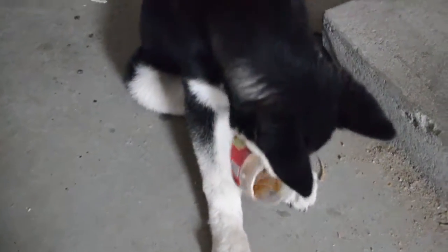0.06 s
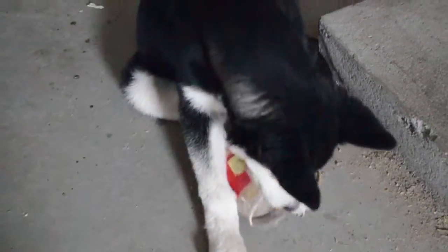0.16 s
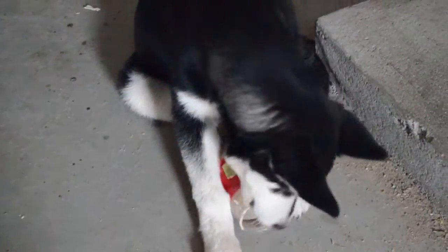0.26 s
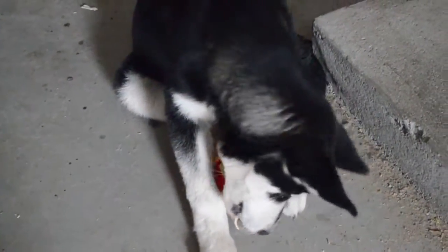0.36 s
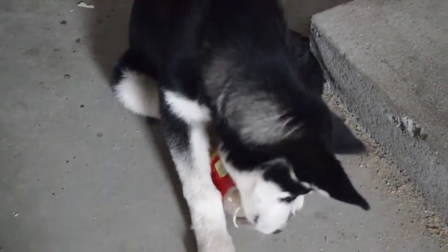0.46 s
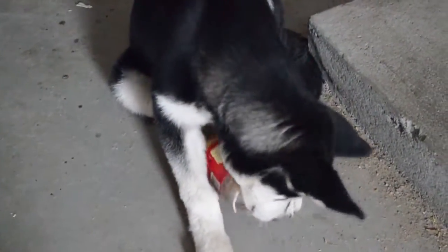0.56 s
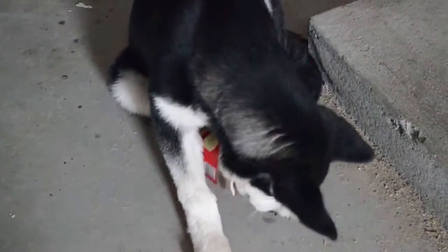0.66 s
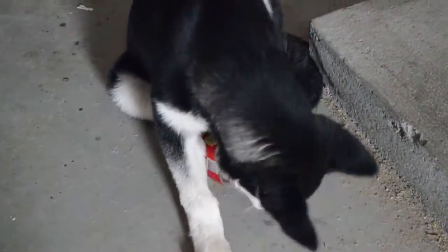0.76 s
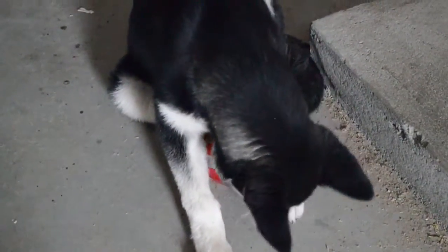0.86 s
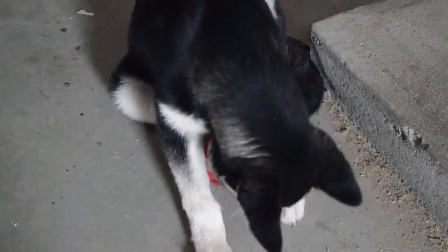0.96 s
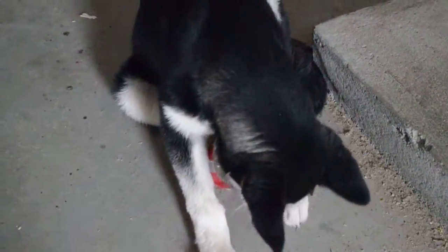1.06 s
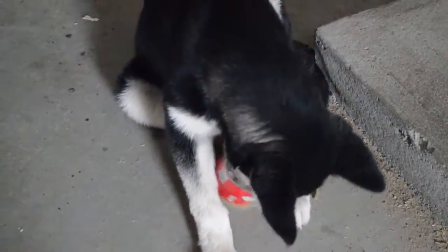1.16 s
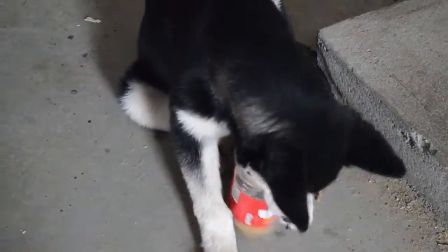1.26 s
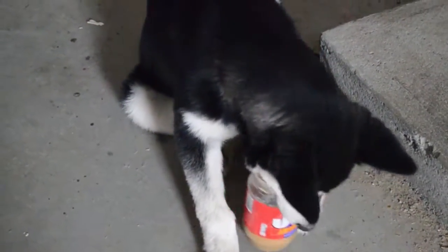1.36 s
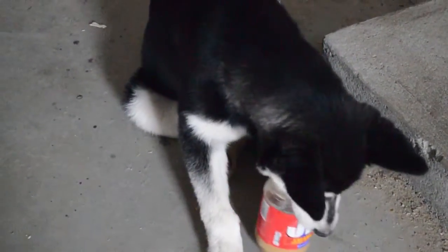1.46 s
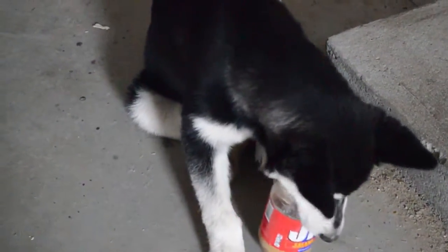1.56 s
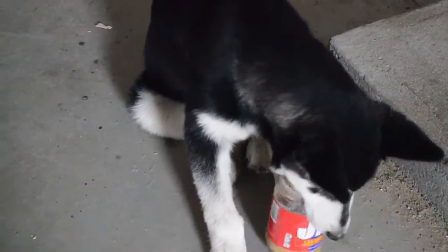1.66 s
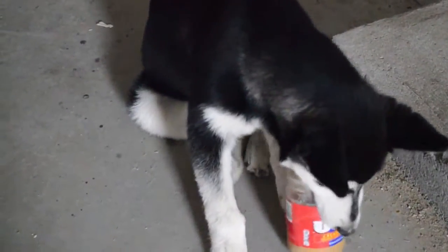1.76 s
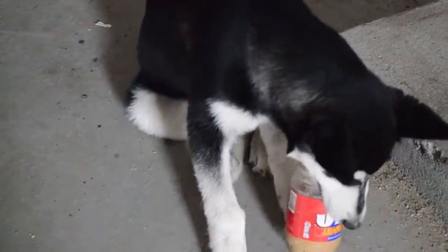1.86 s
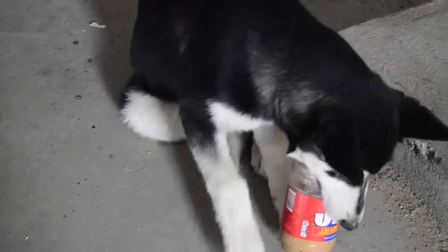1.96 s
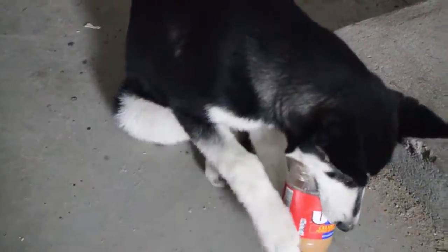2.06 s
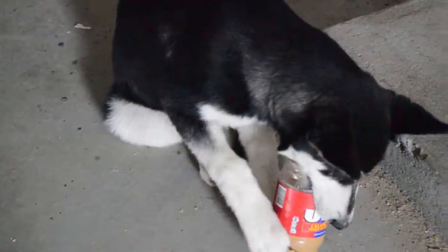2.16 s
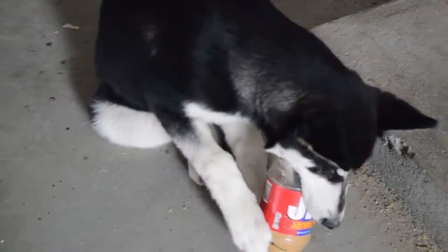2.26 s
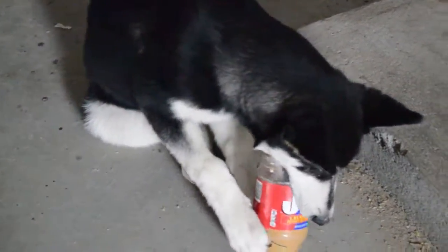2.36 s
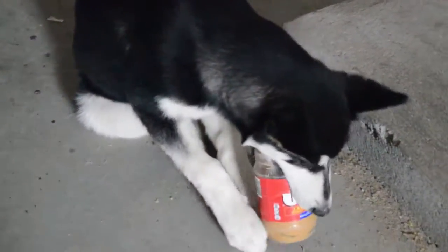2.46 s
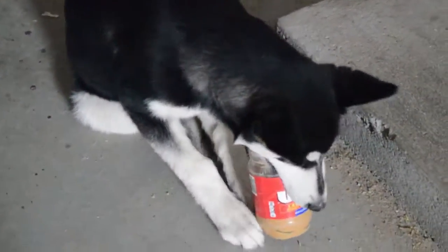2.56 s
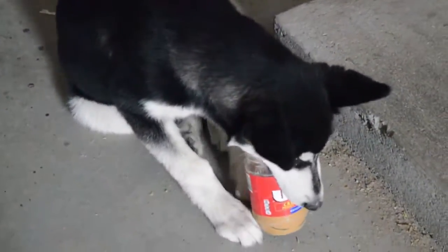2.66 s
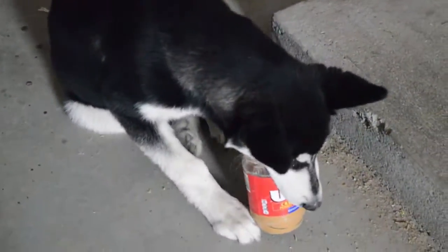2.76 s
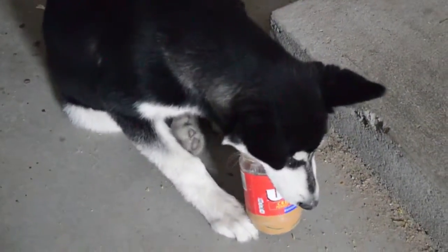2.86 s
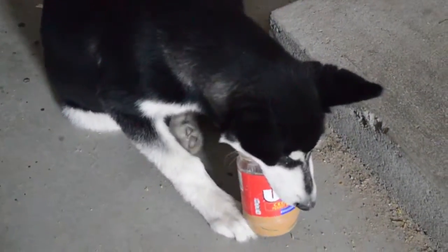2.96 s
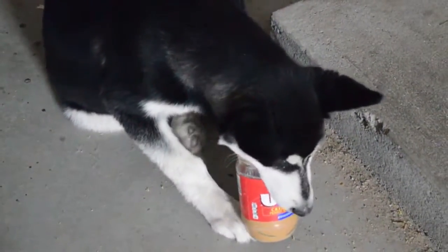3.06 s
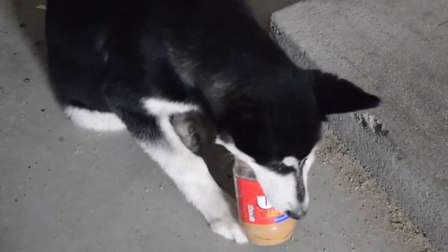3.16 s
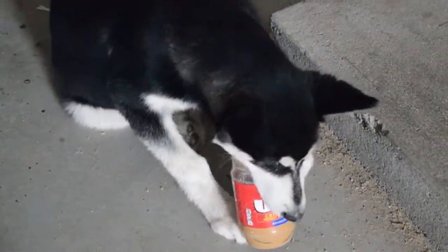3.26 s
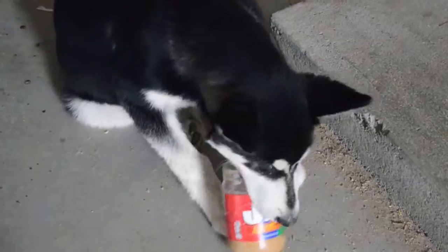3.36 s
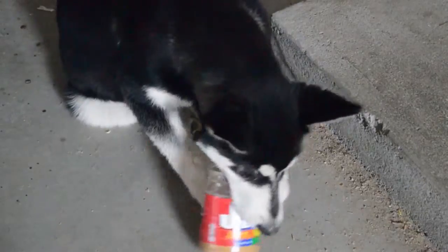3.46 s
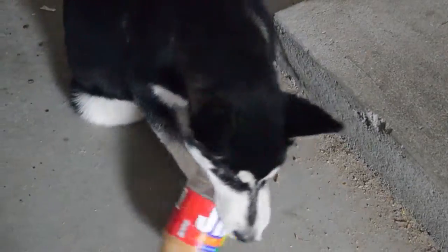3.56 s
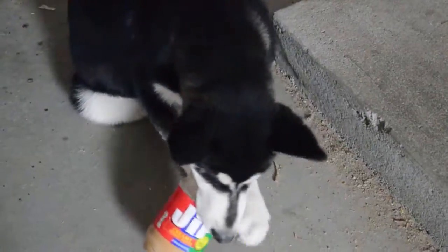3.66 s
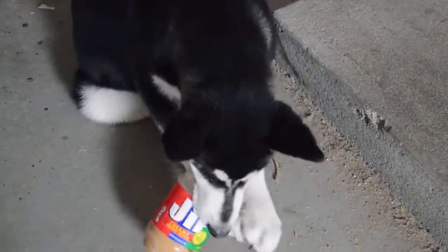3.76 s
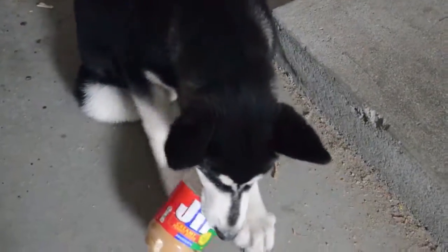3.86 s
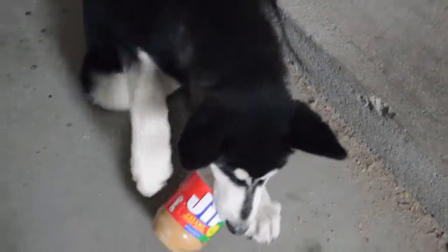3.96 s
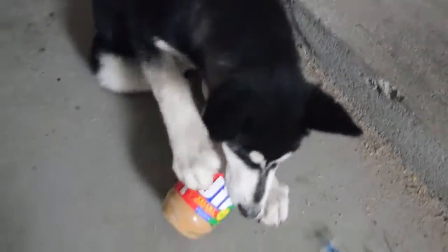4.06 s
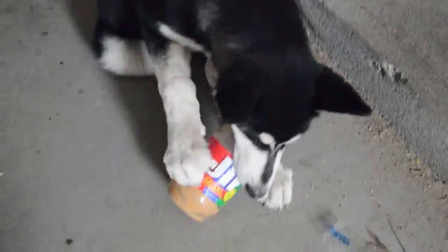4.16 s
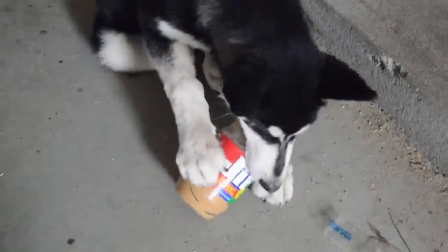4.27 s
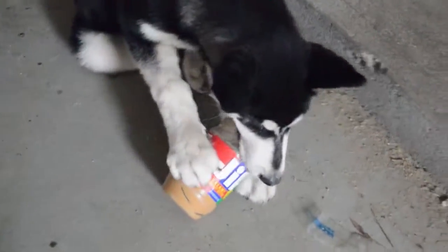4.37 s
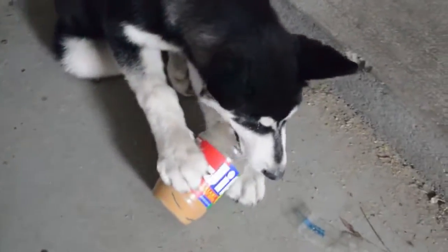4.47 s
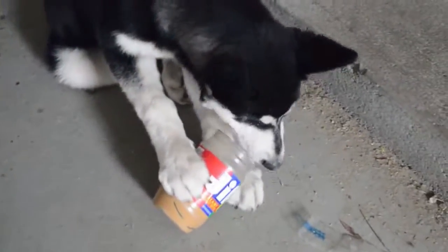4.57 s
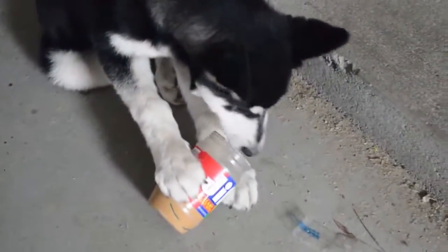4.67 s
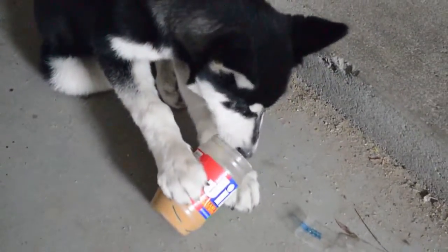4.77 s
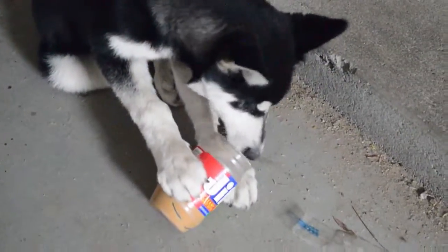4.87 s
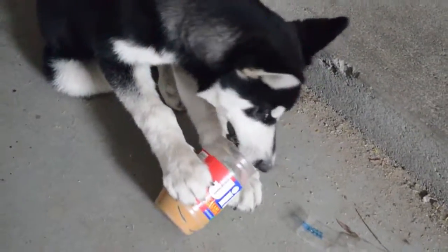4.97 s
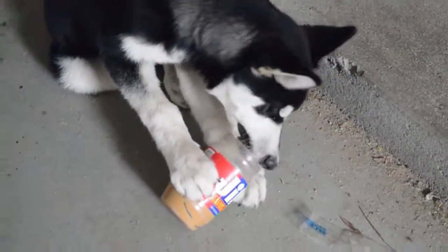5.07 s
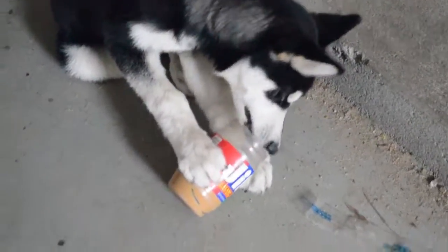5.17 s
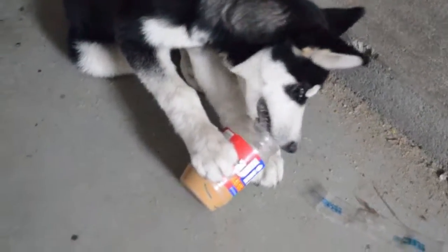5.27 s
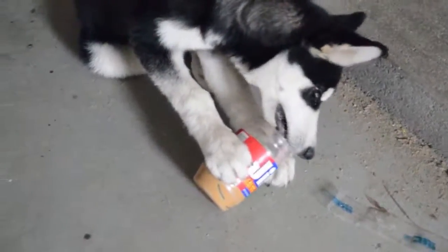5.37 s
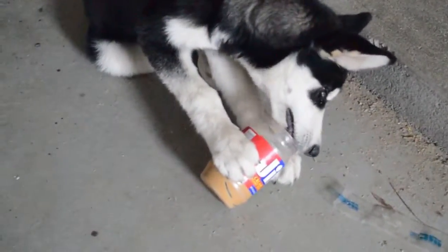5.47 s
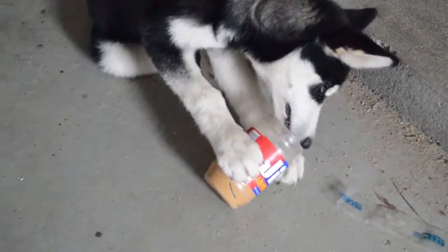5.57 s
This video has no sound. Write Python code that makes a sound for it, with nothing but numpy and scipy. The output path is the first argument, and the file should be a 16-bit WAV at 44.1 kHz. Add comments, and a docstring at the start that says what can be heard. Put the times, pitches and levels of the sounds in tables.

```python
"""Bare, echoing room with a concrete floor: a puppy pushes an empty plastic jar about.
Knocks: noise cracks through the ringing wall, plus a decaying hollow note of the air inside;
the note shifts from knock to knock as the muzzle covers the mouth.
Slides, rasps and rubs: random grit clicks, filtered and swelling. Small clicks, some wet, some the
crackle of the thin wall: pitched noise snaps. Paw pats: dull noise puffs. Behind: air noise, hum, whine."""
import sys
import numpy as np
from scipy import signal
from scipy.io import wavfile
from scipy.ndimage import uniform_filter1d

SR = 44100
rng = np.random.default_rng(int(sys.argv[2]) if len(sys.argv) > 2 else 0)


def master(y):
    """Save y as 16-bit WAV."""
    cut = np.clip(np.atleast_2d(y).T, -1, 1)
    pcm = np.round(cut * 32767)  # scale
    wavfile.write(sys.argv[1], SR, pcm.astype(np.int16))


N = 247821


def amp(db):
    """dB to linear gain."""
    return 10 ** (np.asarray(db) / 20)


def evened(x):
    """Scales to an rms of one."""
    return x / np.sqrt(np.mean(x ** 2) + 1e-20)


def read_spectrum(points, hz):
    """Interpolates a spectrum on a log-frequency axis."""
    point_hz, value = np.transpose(points)
    return np.interp(np.log(hz + 1), np.log(point_hz), value)


def add(mix, start_s, sound):
    """Mixes a sound in at start_s."""
    part = mix[max(round(start_s * SR), 0):][:len(sound)]
    part += sound[:len(part)]


def colour(x, points, size=4096):
    """Causal minimum-phase filter with the given (Hz, dB) spectrum."""
    log_gain = np.log(amp(read_spectrum(points, abs(np.fft.fftfreq(size, 1 / SR)))))
    taps = np.fft.ifft(np.exp(np.conj(signal.hilbert(log_gain)))).real
    return signal.fftconvolve(x, taps[:size // 2])[:len(x)]


def ring(modes, t):
    """Sum of decaying tones; the level of each sets its energy."""
    out = 0
    for hz, db, t60_s in modes:
        energy_scale = np.sqrt(4 * np.log(1000) / (t60_s * SR))
        out = out + amp(db - 60 * t / t60_s) * np.cos(2 * np.pi * hz * t) * energy_scale
    return out


def judder(depth_db, size=N):
    """Uneven gain of a rim that sticks and slips."""
    wander = uniform_filter1d(rng.standard_normal(size), size=500)
    return amp(depth_db * evened(uniform_filter1d(wander, size=250)))


def grains(per_s, spread_db, smooth, size=N):
    """Grit catching and slipping: clicks of uneven size over smooth friction."""
    height = amp(spread_db * np.minimum(rng.exponential(1, size), 4)) * rng.choice([-1, 1], size)
    clicks = height * (rng.random(size) < per_s / SR)
    return evened(clicks) + smooth * rng.standard_normal(size)


def stroke(rows, column, skew=0.48, roundness=0.87):
    """Gain of strokes that gather speed and slow in one arch; skew under 1 puts the top early."""
    gain = np.zeros(N)
    for row in rows:
        start_s, length_s = row[:2]
        progress = np.linspace(0, 1, round(length_s * SR))
        arch = abs(np.sin(np.pi * progress ** skew)) ** roundness
        add(gain, start_s, amp(row[column]) * arch)
    return gain


# steady room air: (frequency [Hz], relative density [dB])
AIR_COLOUR = [(20, -41), (35, -20), (55, -16), (170, -12), (500, -22), (950, -17), (1400, -26),
              (2600, -26.5), (4700, -30), (5350, -17.5), (5900, -30.5), (9000, -31), (15000, -42)]


def background(air_db=-53, hum_hz=64.8, hum_db=-65.5, whine_hz=15666, whine_db=-66,
               swell_top_s=2.143, swell_width_s=0.47, swell_db=7):
    """Steady room air, a thin electric whine and a hum that swells once; levels are rms."""
    t = np.arange(N) / SR
    swell = swell_db * np.exp(-((t - swell_top_s) / swell_width_s) ** 2)
    hum = amp(hum_db + swell) * np.sin(2 * np.pi * hum_hz * t)
    whine = amp(whine_db) * np.sin(2 * np.pi * whine_hz * t)
    air = amp(air_db) * evened(colour(rng.standard_normal(N), AIR_COLOUR))
    return air + np.sqrt(2) * (hum + whine)


# tail decay: (frequency [Hz], t60 [s])
ROOM_DECAY = [(150, 0.93), (350, 0.82), (1000, 0.99), (8000, 0.95), (14000, 0.5)]
# standing waves between the walls: (frequency [Hz], relative level [dB], t60 [s])
STANDING_WAVES = [(223.1, -6, 0.95), (261.3, -7, 0.45), (286.2, -9.5, 0.31), (345, -11, 0.47),
                  (386.3, -9, 0.39)]
# reflections from step and walls: (delay [s], gain before filtering [ratio])
ECHOES = [(0.0098, 0.57), (0.0239, 1), (0.044, 0.55), (0.0573, 0.33), (0.0786, 1)]


def room(x, tail_db, standing_db=-17, build_s=0.028, smear=0.18, scatter_db=3, scatter_s=0.023):
    """Direct sound, reflections, standing waves and a tail that loses its treble first.
    Long waves bounce back cleanly, so a hollow note flutters; rough concrete smears the short ones."""
    t = np.arange(SR) / SR
    hz, when_s, z = signal.stft(rng.standard_normal(SR), SR, nperseg=256)
    decay = amp(-60 * when_s / read_spectrum(ROOM_DECAY, hz)[:, None])
    tail = signal.istft(z * decay, SR, nperseg=256)[1][:SR]
    tail = colour(tail * (1 - np.exp(-t / build_s)), [(300, 3.5), (5000, -1), (10000, -2.5)])
    response = amp(tail_db) * tail / np.linalg.norm(tail)
    response = response + amp(standing_db) * ring(STANDING_WAVES, t)
    response[0] += 1  # direct sound

    early_t = t[:SR // 20]
    bounce = colour(signal.unit_impulse(len(early_t)), [(450, -3), (1200, -17)])
    for delay_s, gain in ECHOES:
        burst = rng.standard_normal(len(early_t)) * np.exp(-early_t / (smear * delay_s))
        burst = colour(burst, [(400, -9), (800, 1)])
        scatter = amp(scatter_db) * np.exp(-delay_s / scatter_s) * burst / np.linalg.norm(burst)
        add(response, delay_s, gain * (bounce + scatter))
    return signal.fftconvolve(x, response)[:N]


# soft paw pats on the floor: (time [s], level before trim [dB])
PATS = [(0.976, -42), (1.496, -37), (1.777, -39.5), (3.339, -30), (4.968, -38), (5.498, -42)]
# pat spectrum: (frequency [Hz], relative level [dB])
PAT_COLOUR = [(30, -7), (90, 2), (150, 17), (250, -18), (2000, -91)]


def pats(trim_db=3, t60_s=0.08, rise_s=0.00083):
    """A paw pad lands with a dull, low puff."""
    out, t = np.zeros(N), np.arange(SR // 5) / SR
    for start_s, db in PATS:
        puff = evened(colour(rng.standard_normal(len(t)), PAT_COLOUR))
        envelope = amp(db + trim_db - 60 * t / t60_s) * (1 - np.exp(-t / rise_s))
        add(out, start_s, envelope * puff)
    return out


# small clicks, some wet, some the crackle of the thin plastic wall:
# (time [s], level before trim [dB], pitch [Hz])
TICKS = [(0.5257, -35, 4800), (0.764, -37.5, 8800), (0.8322, -34.5, 7350), (1.076, -37.5, 6510),
         (1.479, -41.5, 3960), (1.769, -39, 9600), (1.923, -46.5, 8900), (2.273, -35, 3160),
         (2.316, -34, 3440), (3.076, -45, 7200), (4.088, -27, 4240), (4.5337, -39.5, 7450),
         (4.644, -36.5, 7880), (4.952, -36.5, 2400)]


def ticks(trim_db=3, fall_s=0.001):
    """Tiny snaps, each a few milliseconds of noise round its own pitch."""
    out, t = np.zeros(N), np.arange(SR // 40) / SR
    for start_s, db, hz in TICKS:
        snap = rng.standard_normal(len(t)) * t / fall_s * np.exp(-t / fall_s)
        snap = colour(snap, [(hz / 5, -26), (hz * 0.64, -11), (hz, 0), (hz * 1.31, -10), (hz * 2, -34)])
        onset_rms = np.sqrt(np.mean(snap[:SR // 200] ** 2))
        add(out, start_s, amp(db + trim_db) * snap / onset_rms)
    return out


# jar wall modes before squeeze: (frequency [Hz], relative level [dB], t60 [s])
WALL_MODES = [(838, -8, 0.047), (1890, -36, 0.04), (1810, -14.5, 0.024), (2034, -7, 0.012),
              (2400, -19.5, 0.011), (2625, 1, 0.011)]


def wall(x, ring_db, squeeze=0.07):
    """Thin plastic passes a push at once, then rings a little higher or lower as it is squeezed."""
    t = np.arange(SR // 8) / SR * (1 + squeeze * rng.uniform(-0.83, 1))
    return x + amp(ring_db) * signal.fftconvolve(x, ring(WALL_MODES, t))[:len(x)]


# long licks or rubs on the pinned jar:
# (start [s], length [s], body before trim [dB], hiss before trim [dB])
RUBS = [(4.48, 0.73, -43.5, -46), (5.17, 0.7, -41.5, -47.5)]
# friction body, shared with slides: (frequency [Hz], relative level [dB])
GRIND_COLOUR = [(80, -18), (400, -0.5), (1000, 0.5), (2600, 4.5), (3200, 0), (4100, -1), (5000, -13.5),
                (16000, -49)]
# fine hiss, shared with slides: (frequency [Hz], relative level [dB])
GRIT_COLOUR = [(1500, -25), (4500, -13.5), (7000, 4.5), (8500, 1), (10000, -1), (11500, -8), (13000, -17),
               (16000, -30)]


def rubs(body_trim_db=-4, hiss_trim_db=-3):
    """Fur and tongue give a much finer friction than concrete."""
    contact = grains(per_s=2800, spread_db=7.0, smooth=0.97)
    body = evened(wall(colour(contact, GRIND_COLOUR), ring_db=-23.5)) * stroke(RUBS, column=2)
    hiss = evened(colour(contact, GRIT_COLOUR)) * stroke(RUBS, column=3)
    return amp(body_trim_db) * body + amp(hiss_trim_db) * hiss


# shoves over the floor: (start [s], length [s], grind before trim [dB], fine grit before trim [dB],
# drone before trim [dB], hollow note [Hz])
SLIDES = [(0.489, 0.23, -41, -41.5, -44, 393), (0.717, 0.28, -43, -42.5, -41.5, 340),
          (1.016, 0.17, -40.5, -50.5, -34, 327), (1.07, 0.33, -51, -46, -31, 366),
          (1.18, 0.12, -33, -36, -31, 382), (1.91, 0.48, -44.5, -52.5, -46, 327),
          (2.337, 0.29, -39, -44, -40.5, 362), (2.442, 0.077, -37, -39.5, -49, 357),
          (2.769, 0.67, -47, -57, -58, 310), (3.386, 0.29, -35, -35.5, -34, 363),
          (3.759, 0.24, -44.5, -45, -45.5, 315.2)]
# shaken air in the jar: (multiple of hollow note [ratio], relative level [dB])
DRONE_COLOUR = [(0.25, -32), (0.62, -14), (0.8, -6.5), (1, 1), (1.3, -19), (1.6, -9), (2.2, -22), (8, -113)]


def slides(grind_trim_db=-3, grit_trim_db=-3, drone_trim_db=-6):
    """The rim judders over concrete and shakes the wall; coarser bumps shake the air inside."""
    grip = judder(depth_db=3.5)
    coarse = grains(per_s=500, spread_db=2.2, smooth=0.35)
    fine = grains(per_s=2900, spread_db=0.0, smooth=1.0)
    bumps = grains(per_s=75, spread_db=-0.5, smooth=0)
    grind = evened(wall(colour(coarse * grip, GRIND_COLOUR), ring_db=-26.0)) * stroke(SLIDES, column=2)
    grit = evened(colour(fine * grip, GRIT_COLOUR)) * stroke(SLIDES, column=3)
    drone = np.zeros(N)
    for row in SLIDES:
        hollow_hz = row[5]
        spectrum = [(ratio * hollow_hz, db) for ratio, db in DRONE_COLOUR]
        drone += evened(colour(bumps, spectrum)) * stroke([row], column=4)
    return amp(grind_trim_db) * grind + amp(grit_trim_db) * grit + amp(drone_trim_db) * drone


# rasps of the rim on grit: (start [s], nominal length [s], level before trim [dB], pitch [Hz])
SCRATCHES = [(0.508, 0.023, -40, 5030), (0.561, 0.06, -40, 4000), (0.566, 0.1, -41.5, 2640),
             (1.09, 0.062, -37.5, 806), (1.108, 0.016, -32.5, 2210), (1.151, 0.016, -29, 2240),
             (1.257, 0.038, -38, 2480), (2.453, 0.04, -31, 1700), (3.366, 0.048, -32, 9500),
             (3.396, 0.015, -33, 1880), (3.435, 0.018, -31, 2390), (3.474, 0.025, -28, 1548),
             (3.522, 0.016, -28.5, 2520), (4.049, 0.02, -25, 2350)]
# broad jar wall spectrum, shared with knocks: (frequency [Hz], relative level [dB])
WALL_COLOUR = [(100, -25), (300, 10.5), (600, -2.5), (850, 5), (1800, 7), (2600, 6), (3200, 0.5), (4200, 6),
               (5000, -3.5), (8000, 1.5), (10500, -4.5), (13000, -15), (16000, -53)]


def scratches(trim_db=-1, fade_db=-12, peak_db=6, peak_ratio=1.47, rise_share=0.14,
              sing_db=-23, sing_t60_s=0.058):
    """The rim catches on grit and chatters; the patch of wall it bends sings at its own pitch."""
    out, t = np.zeros(N), np.arange(SR // 4) / SR
    for start_s, length_s, db, hz in SCRATCHES:
        chatter = grains(per_s=800, spread_db=1.0, smooth=0.3, size=len(t))
        chatter = chatter * judder(depth_db=2, size=len(t))
        patch = [(hz / peak_ratio, 0), (hz, peak_db), (hz * peak_ratio, 0)]
        rasp = colour(wall(colour(chatter, WALL_COLOUR), ring_db=-18), patch)
        rise = np.minimum(t / (rise_share * length_s), 1)
        rasp = rasp * amp(fade_db * (t / length_s) ** 2) * rise
        singing = signal.fftconvolve(rasp, ring([(hz, 0, sing_t60_s)], t))[:len(t)]
        rasp = rasp + amp(sing_db) * singing
        loudness = np.sqrt(np.sum(rasp ** 2) / (2 * length_s * SR))
        add(out, start_s, amp(db + trim_db) * rasp / loudness)
    return out


# knocks: (time [s], wall before trim [dB], hollow before trim [dB], nominal hollow note [Hz],
# treble against wall [dB])
KNOCKS = [(0.086, -40, -35.5, 430, 1.5), (0.188, -28, -21.5, 377, 0), (0.213, -33, -18, 407, 1.5),
          (0.725, -35.5, -25.5, 303, 25), (0.861, -46, -30, 321, -1), (1.097, -34, -22.5, 290, 0),
          (1.199, -23.5, -32, 296, -3), (1.253, -26.5, -45, 390, -6), (1.48, -29, -21, 345, -18),
          (1.767, -20.5, -19, 366, -13.5), (1.92, -37, -23, 355, -6), (1.995, -43, -29, 315, -1),
          (2.06, -29.5, -35, 394, 3), (2.275, -33, -27.5, 287, 2), (2.318, -34.5, -28, 344, -3),
          (2.462, -24.5, -27.5, 302, -26), (2.795, -39.5, -36, 308, -9), (2.844, -37.5, -49, 302, 1),
          (3.074, -35, -29, 323, -5.5), (3.26, -39, -34.5, 323, -4), (3.336, -29.5, -21, 303, -6),
          (3.359, -33, -27, 306, -19), (3.542, -21.5, -18, 360, 8.5), (3.61, -28, -5, 354.4, -5),
          (3.631, -29, -19, 368, 6), (4.049, -19.5, -25.5, 355.4, 3.5), (4.06, -25, -22.5, 299, -8),
          (4.092, -20, -21, 362, -2.5)]


def thumps(trim_db=2, t60_s=0.031, swell_s=0.0031, sag=0.013, sag_s=0.0015):
    """Blows pump the air in the jar: a short hollow note sags as the muzzle covers the mouth."""
    out, t = np.zeros(N), np.arange(SR // 4) / SR
    for start_s, _, db, hz, _ in KNOCKS:
        turns = np.cumsum(hz * (1 + sag * (np.exp(-t / sag_s) - 0.5))) / SR
        envelope = 2 * amp(db + trim_db - 60 * t / t60_s) * (1 - np.exp(-t / swell_s)) ** 2
        add(out, start_s, envelope * np.sin(2 * np.pi * turns))
    return out


def knocks(trim_db=0.0, snap=0.15, snap_s=0.0015, crumple=0.12, crumple_t60_s=0.045):
    """The same blows crack the wall, which buckles briefly."""
    out, t = np.zeros(N), np.arange(SR // 4) / SR
    for start_s, db, _, _, treble_db in KNOCKS:
        buckling = snap * np.exp(-t / snap_s) + crumple * amp(-60 * t / crumple_t60_s)
        push = (t == 0) + rng.standard_normal(len(t)) * buckling
        crack = wall(colour(push, WALL_COLOUR), ring_db=-22.5)
        crack = colour(crack, [(2800, 0), (5200, treble_db)])
        onset_rms = np.sqrt(np.mean(crack[:SR // 200] ** 2))
        add(out, start_s, amp(db + trim_db) * crack / onset_rms)
    return out


# stereo width: (frequency [Hz], side against mid [dB])
WIDTH = [(3500, -80), (5000, -10), (8000, -16), (13000, -4)]


def scene():
    """Both channels are alike except in the treble, where a random-phase copy adds width."""
    mid = background() + pats()
    mid = mid + room(ticks(), tail_db=-6.5, scatter_db=-2)
    mid = mid + room(rubs() + slides() + scratches(), tail_db=-7.0)
    mid = mid + room(thumps(), tail_db=-5.0) + room(knocks(), tail_db=-4.5)
    z = signal.stft(mid, nperseg=256)[2]
    random_phase = np.exp(2j * np.pi * rng.random(z.shape))
    phase_copy = signal.istft(z * random_phase, nperseg=256)[1][:N]
    side = colour(np.sqrt(2) * phase_copy, WIDTH)
    return np.array([mid + side, mid - side])


def record(dry, edge_hz=15950):
    """Steep linear-phase low-pass: the band limit of the recorder."""
    taps = signal.firwin(511, edge_hz, window=("kaiser", 9), fs=SR)
    return signal.oaconvolve(dry, taps[None], "same")


dry = scene()
out = record(dry)
master(out)
```